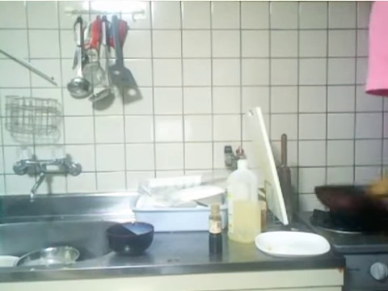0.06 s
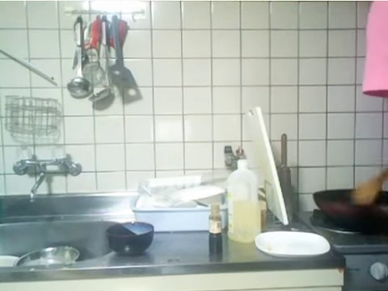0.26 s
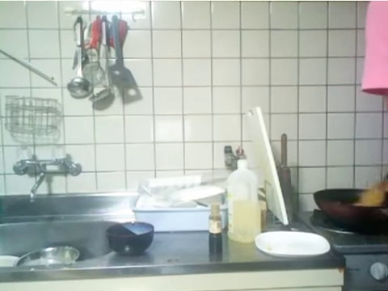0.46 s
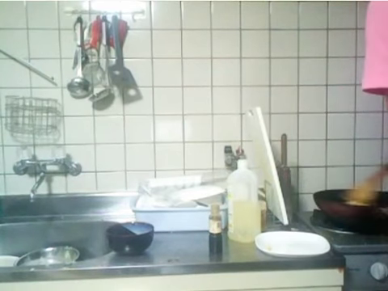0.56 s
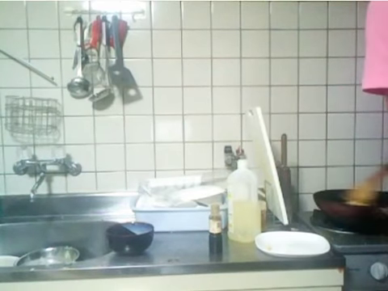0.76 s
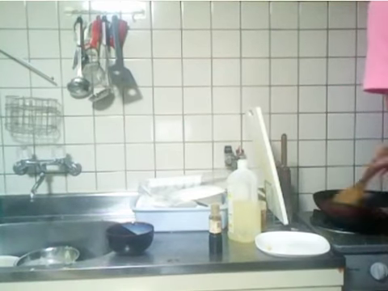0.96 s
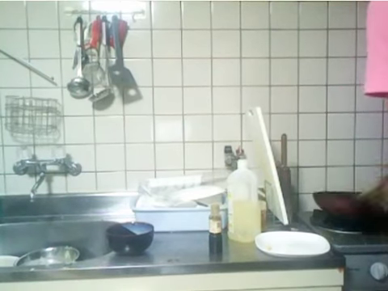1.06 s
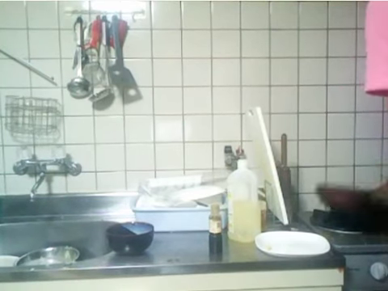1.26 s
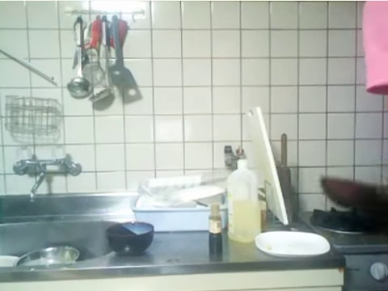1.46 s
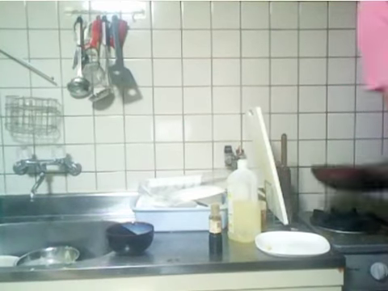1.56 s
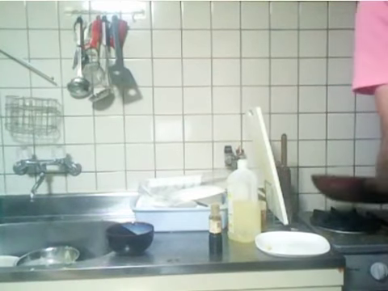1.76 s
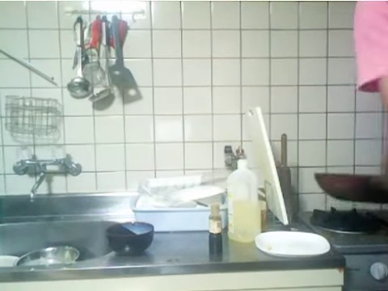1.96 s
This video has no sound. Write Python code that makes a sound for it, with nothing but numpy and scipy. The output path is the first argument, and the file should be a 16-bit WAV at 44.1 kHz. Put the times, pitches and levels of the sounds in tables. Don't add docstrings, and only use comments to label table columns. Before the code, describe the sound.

Sharp metallic pan clatter on a gas stove early on, ringing shortly off kitchen tiles, followed by faint wooden taps, a scraping drag and a lighter clink, over steady low extractor drone and faint sizzle, through a cheap, hissy microphone.

```python
import sys
import numpy as np
from scipy import signal
from scipy.io import wavfile

SR = 44100
rng = np.random.default_rng(int(sys.argv[2]) if len(sys.argv) > 2 else 0)


def dump(signal):
    limited = np.clip(np.atleast_2d(signal).T, -1, 1)
    pcm = np.round(limited * 32767).astype(np.int16)
    wavfile.write(sys.argv[1], SR, pcm)


def field_ratio(decibels):
    return 10 ** (np.asarray(decibels, dtype=float) / 20)


N = 90404


def rms_one(x):
    return x / np.sqrt(np.mean(x ** 2) + 1e-20)


def at_hz(points, hz):
    point_hz, value = np.array(points).T
    return np.interp(np.log(hz), np.log(point_hz), value)


def low_pass(x, order, ripple_db, stop_db, top_hz):
    return signal.sosfilt(signal.ellip(order, ripple_db, stop_db, top_hz, fs=SR, output="sos"), x)


def band(x, hz, octaves):
    edges = np.clip(hz * 2 ** (np.array([-0.5, 0.5]) * octaves), 10, 0.45 * SR)
    return signal.sosfilt(signal.butter(2, edges, "band", fs=SR, output="sos"), x)


def resonance(x, hz, width_hz):
    r = np.exp(-np.pi * width_hz / SR)
    zeros = [(1 - r * r) / 2, 0, (r * r - 1) / 2]
    poles = [1, -2 * r * np.cos(2 * np.pi * hz / SR), r * r]
    return signal.lfilter(zeros, poles, x)


def sharp_resonance(x, hz, width_hz):
    return resonance(resonance(x, hz, width_hz), hz, width_hz)


def drift(rate_hz):
    knots = rng.standard_normal(200)
    return np.interp(np.arange(N) / SR * rate_hz, np.arange(len(knots)), knots)


def grit():
    contacts_per_s, size_spread_db = 7000, 3.5
    sizes = field_ratio(size_spread_db * np.minimum(rng.exponential(1, N), 3))
    signs = rng.choice([-1, 1], N)
    touching = rng.random(N) < contacts_per_s / SR
    return rms_one(sizes * signs * touching + 1e-9)


def chatter(contacts):
    attack_s = 0.00077
    t, out, rough = np.arange(N) / SR, 0, grit()
    for k, (start_s, level_db, decay_s, hz, octaves) in enumerate(contacts):
        attack = np.clip((t - start_s) / attack_s, 0, 1)
        shape = attack * np.exp(-np.maximum(t - start_s, 0) / decay_s)
        other_grit = np.roll(rough, 3001 * k)
        out = out + field_ratio(level_db) * shape * rms_one(band(other_grit, hz, octaves))
    return out


def knocks():
    # start_s, level_db, decay_s, centre_hz, breadth_octaves
    impacts = [(.242, -19.5, 0.021, 2470, 2.3), (.246, -28.5, 0.082, 300, 1.13),
               (.249, -20, 0.014, 2150, 1.32), (.259, -23.5, 0.013, 1300, 1.94),
               (.262, -28.5, 0.019, 764, 2.2), (.268, -22.5, 0.01, 1190, 4.2),
               (.282, -24, 0.0054, 415, 2.9), (.284, -26.5, 0.013, 1900, 2.1),
               (.305, -34, 0.035, 1500, 3.5), (.332, -40, 0.019, 1770, 1.8),
               (.339, -31.5, 0.045, 2050, 1.7), (.341, -41, 0.023, 262, 0.91), (.35, -32, .015, 776, 1.1),
               (.362, -26, 0.0087, 1330, 1.5), (.385, -41.5, 0.0083, 1060, 2.8),
               (1.507, -39.5, 0.016, 5500, 1.24), (1.508, -41, 0.016, 1760, 0.39),
               (1.510, -43.5, 0.013, 1097, 0.11), (1.513, -47.5, 0.011, 600, 2.6),
               (1.525, -52.5, 0.075, 2920, 2.6), (1.612, -46, 0.0044, 1344, 0.37),
               (1.668, -56.5, .04, 1300, 1.5), (1.67, -56.5, .03, 5500, 1.4),
               (1.998, -63, 0.019, 6500, 0.55)]
    return chatter(impacts)


def taps():
    # start_s, level_db, decay_s, centre_hz,
    # breadth_octaves
    touches = [(.001, -58.5, 0.028, 1590, 1.04), (.02, -62.5, 0.026, 5070, 1.2),
               (.27, -42, 0.028, 142, 1.4), (.42, -53, 0.027, 1510, 3.5), (.628, -62, 0.05, 2260, 0.21),
               (.632, -64.5, 0.03, 3730, 0.092), (.745, -52, 0.022, 1280, 0.51),
               (.827, -50.5, .035, 1600, 0.9), (.84, -48, 0.037, 433, 0.63), (.87, -50.5, 0.019, 175, 1.36),
               (1.515, -53, 0.032, 2260, 0.25), (1.672, -56, 0.026, 513, 0.29)]
    return chatter(touches)


def drag():
    drag_octaves, squeak_width_share = 1.7, 0.09
    # start_s, peak_db, rise_s, fall_s, centre_hz
    strokes = [
        (.315, -33, 0.021, 0.043, 2340),
        (1.131, -53, 0.063, 0.014, 1380),
        (1.169, -48.5, 0.026, 0.07, 3700),
        (1.183, -46, 0.044, 0.078, 926),
        (1.214, -49.5, 0.024, 0.075, 2040),
        (1.37, -64.5, 0.031, 0.037, 3460),
        (1.475, -58.5, 0.039, 0.016, 2000),
        (1.529, -56, 0.016, .1, 875),
    ]
    # start_s, level_db, length_s, pitch_hz
    squeaks = [(1.174, -64, 0.13, 4800), (1.187, -52.5, 0.087, 3700), (1.191, -53, 0.021, 1238),
               (1.194, -56, 0.1, 780), (1.198, -50, 0.056, 2480), (1.206, -50.5, 0.09, 1690),
               (1.242, -45, 0.042, 2080), (1.243, -51, .1, 1850)]
    t, out, rough = np.arange(N) / SR, 0, grit()
    for start_s, peak_db, rise_s, fall_s, hz in strokes:
        peak_s = start_s + rise_s
        shape = np.interp(t, [start_s, peak_s, peak_s + fall_s], [0, 1, 0])
        out = out + field_ratio(peak_db) * shape * rms_one(band(rough, hz, drag_octaves))
    for start_s, level_db, length_s, hz in squeaks:
        shape = np.interp(t, [start_s, start_s + 0.19 * length_s, start_s + length_s], [0, 1, 0])
        tone = rms_one(sharp_resonance(rough, hz, squeak_width_share * hz))
        out = out + field_ratio(level_db) * shape * tone
    return out


def pan(contact):
    ring_db, crowd_db, crowd_t60_s = -3, -3, 0.084
    # pitch_hz, level_db over the bare contact, t60_s
    modes = [(322, -0.5, 0.14), (442, 11, 0.34), (505.5, -1, 0.36), (730, 6, 0.24), (1300, 3, 0.027),
             (1548, -27, 0.26), (1850, 3, 0.052), (2140, -13, 0.36), (2256, -2.5, 0.27), (2663, -1, 0.34),
             (3620, -27, 0.36), (4010, -11, 0.17), (4930, -6, 0.36), (4950, 0, 0.14)]
    crowd_hz = np.sort(rng.uniform(300, 9000, 60))
    crowd_levels = crowd_db + 4 * rng.standard_normal(60)
    crowd = [(hz, db, crowd_t60_s) for hz, db in zip(crowd_hz, crowd_levels)]
    out = contact.copy()
    for k, (hz, level_db, t60_s) in enumerate(list(modes) + crowd):
        width_hz = np.log(1000) / (np.pi * t60_s)
        out += (-1) ** k * field_ratio(level_db + ring_db) * resonance(contact + 1e-18, hz, width_hz)
    return out


def sizzle():
    # time_s, level_db
    loudness = [
        (0, -61),
        (.2, -105),
        (.55, -83),
        (.85, -62),
        (1.0, -83),
        (1.15, -63),
        (1.4, -68.5),
        (1.6, -61),
        (1.75, -90),
        (2.05, -96),
    ]
    time_s, level_db = np.transpose(loudness)
    steam = rng.standard_normal(N) * field_ratio(drift(39.6))
    return field_ratio(np.interp(np.arange(N) / SR, time_s, level_db)) * rms_one(band(steam, 5500, 2.7))


def kitchen(x):
    level_db, first_wall_s = -4, 0.0013
    # band_hz, t60_s
    decay = [(150, 0.34), (500, 0.46), (1500, 0.29), (4000, 0.12), (9000, 0.41)]
    t = np.arange(SR // 2) / SR
    white, echo = rng.standard_normal((2, len(t))), 0
    for k, hz in enumerate(80 * 2 ** np.arange(0, 8, 0.5)):
        echo = echo + band(white[k % 2], hz, 0.5) * field_ratio(-60 * t / at_hz(decay, hz))
    echo = echo * np.minimum(t / first_wall_s, 1)
    echo = echo / np.sqrt(np.sum(echo ** 2))
    return field_ratio(level_db) * signal.fftconvolve(x, echo)[:N]


def fan():
    air_db, flicker_db = -56, -1.13
    rotor_hz, rotor_db, rotor_wobble_db = 33, -56.5, 6
    # band_hz, level_db per Hz
    air_spectrum = [(26, -31), (45, 13), (91, -5), (205, -14), (307, 0), (462, -13), (678, -15),
                    (1600, -19), (10000, -34.5), (13000, -75), (22000, -120)]
    # pitch_hz, width_hz, level_db
    duct = [(34.1, 5.2, -53), (20, 13, -56), (81, 57, -62.5), (108, 53, -71.5), (246.2, 14.4, -62),
            (300, 44, -54), (369, 16, -61), (710, 133, -65)]
    white, air, shared = rng.standard_normal((2, N + SR)), 0, drift(1.2)
    for k, hz in enumerate(64 * 2 ** np.arange(0, 8, 0.5)):
        band_db = at_hz(air_spectrum, hz) + flicker_db * (shared + drift(10.69))
        air = air + field_ratio(band_db) * band(white[k % 2], hz, 0.42)[SR:]
    rotor = np.sin(2 * np.pi * rotor_hz * np.arange(N) / SR)
    out = field_ratio(air_db) * rms_one(air) + field_ratio(rotor_db + rotor_wobble_db * drift(4.4)) * rotor
    for hz, width_hz, level_db in duct:
        hum = sharp_resonance(rng.standard_normal(N + SR), hz, width_hz)[SR:]
        out += field_ratio(level_db) * rms_one(hum)
    return out


def scene():
    struck = pan(knocks() + taps() + drag())
    return (struck + kitchen(struck) + fan() + sizzle())[None]


def roll_off(x):
    return signal.sosfilt(signal.butter(12, 16010, fs=SR, output="sos"), x)


def record(dry):
    mic_top_hz, mirror_top_hz, mirror_db = 6500, 12900, 2.5
    preamp_top_hz, preamp_db, hiss_db = 8300, -72.5, -72.5
    x = signal.sosfilt(signal.butter(3, mic_top_hz, fs=SR, output="sos"), dry)
    x = low_pass(x, 6, 0.5, 40, 9900)
    flipped = x * (-1.0) ** np.arange(N)
    mirror = signal.sosfilt(signal.butter(6, mirror_top_hz, fs=SR, output="sos"), flipped)
    white = rng.standard_normal((2,) + x.shape)
    preamp = field_ratio(preamp_db) * low_pass(white[0], 6, 0.5, 30, preamp_top_hz)
    x = x + field_ratio(mirror_db) * mirror + preamp + field_ratio(hiss_db) * white[1]
    mix = low_pass(x, 8, 0.5, 50, 15900)
    return roll_off(mix)


dry = scene()
out = record(dry)
dump(out)
```